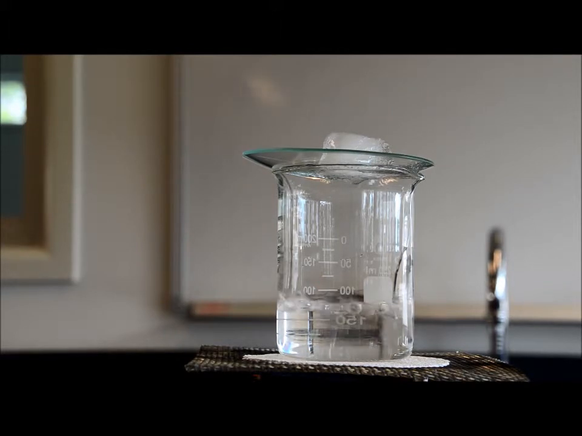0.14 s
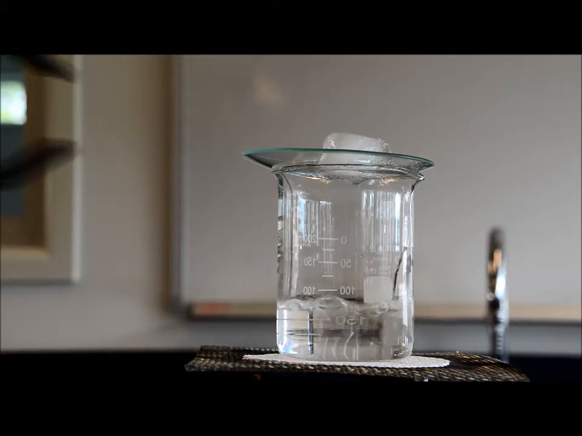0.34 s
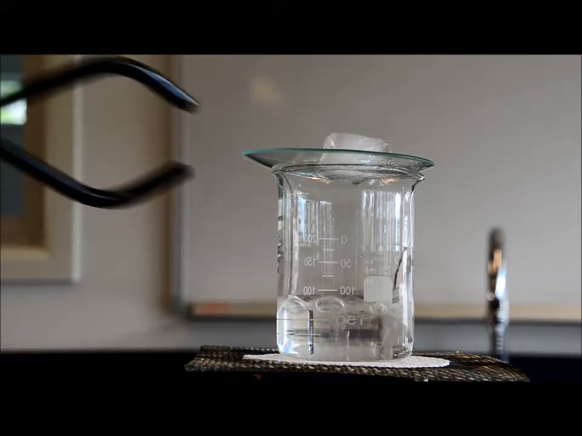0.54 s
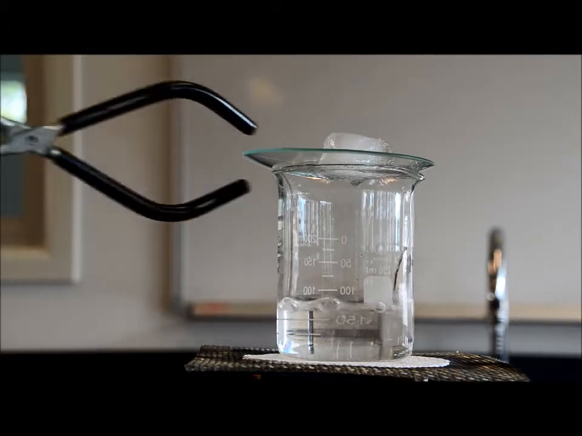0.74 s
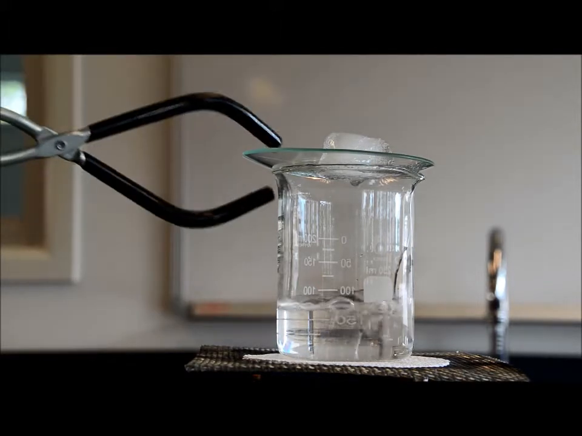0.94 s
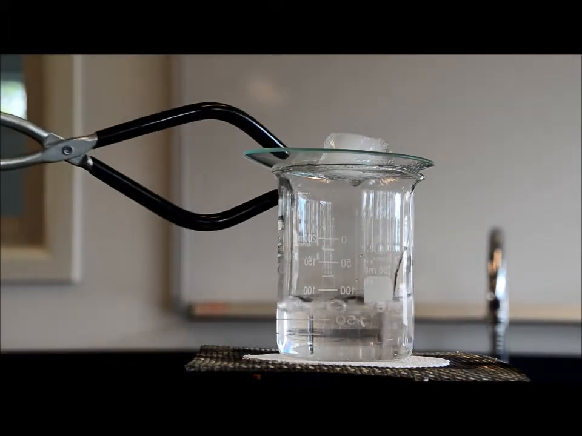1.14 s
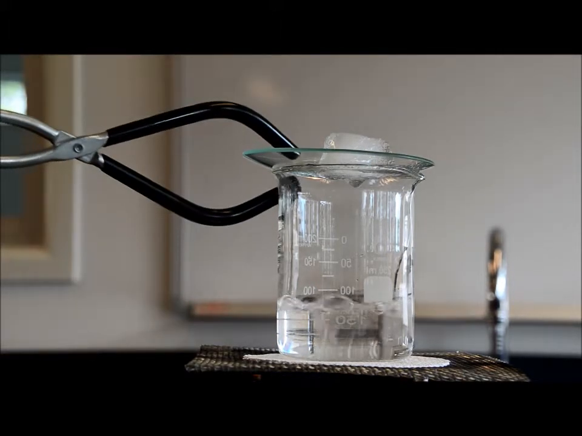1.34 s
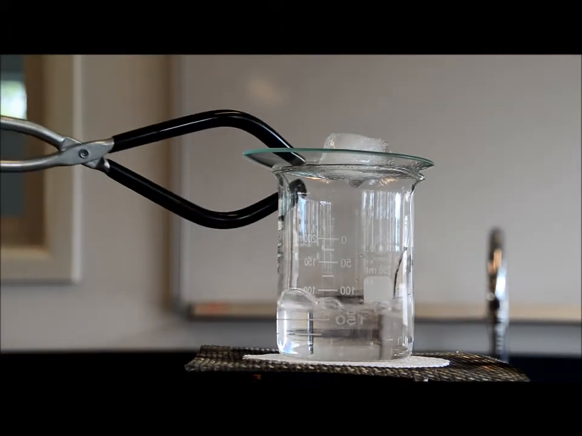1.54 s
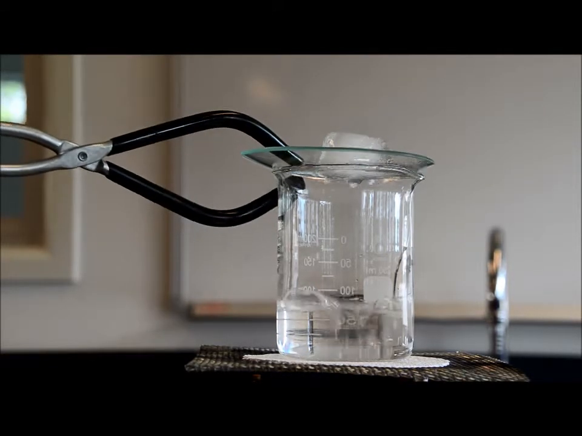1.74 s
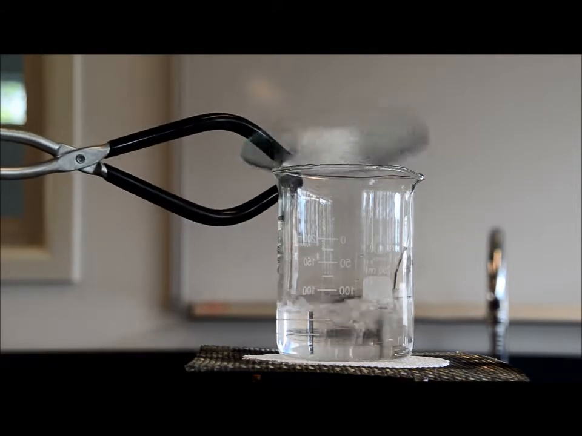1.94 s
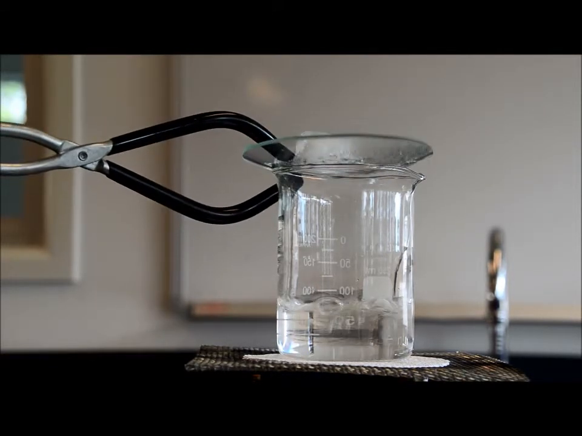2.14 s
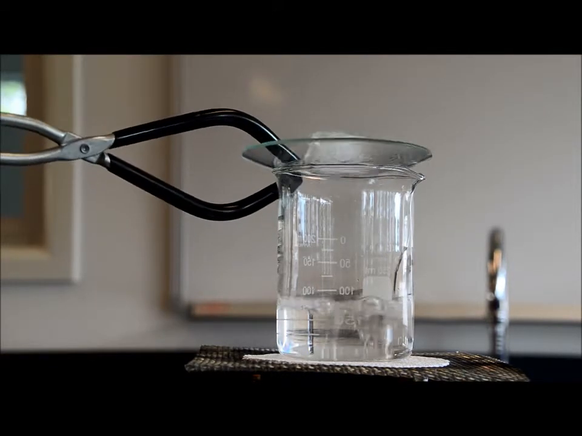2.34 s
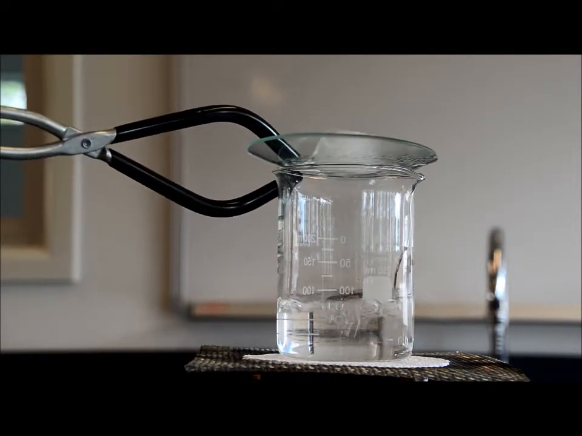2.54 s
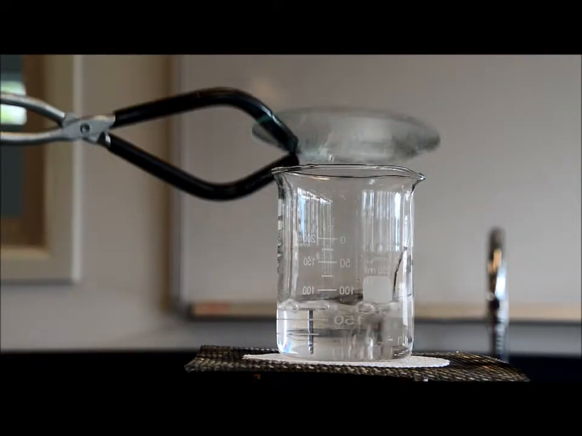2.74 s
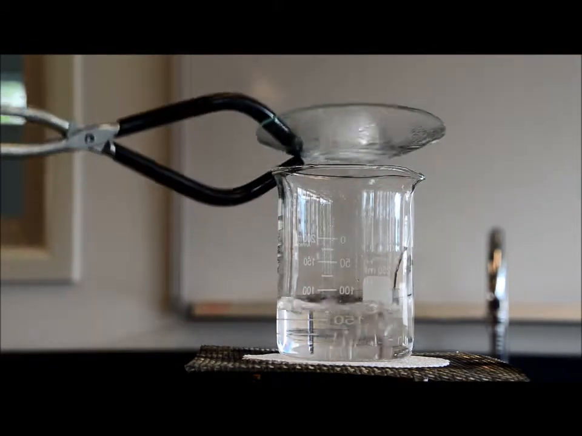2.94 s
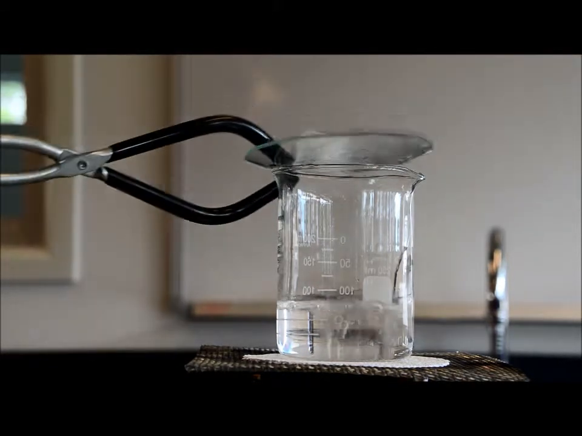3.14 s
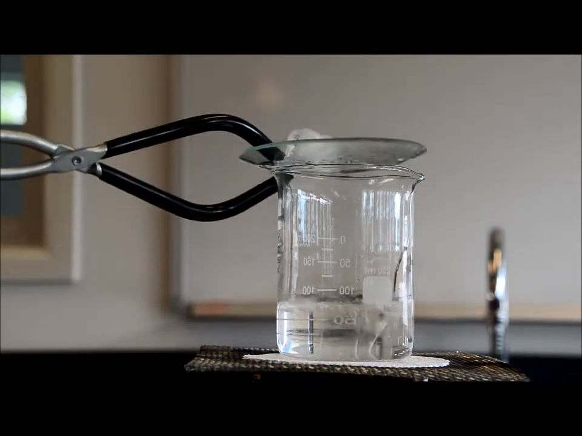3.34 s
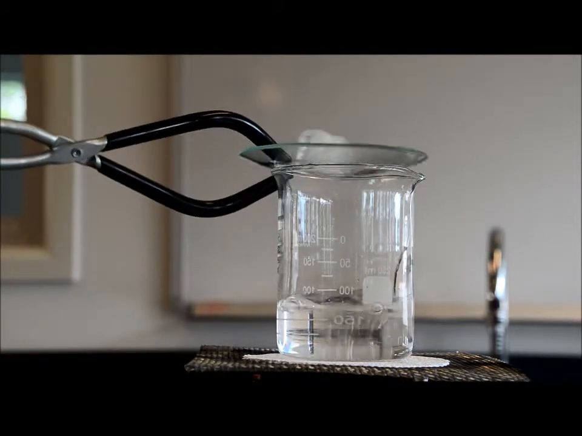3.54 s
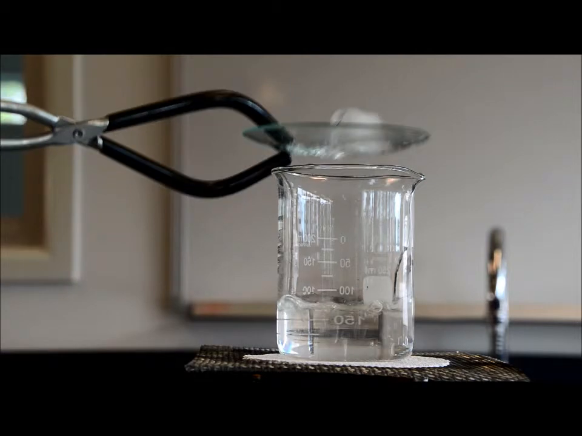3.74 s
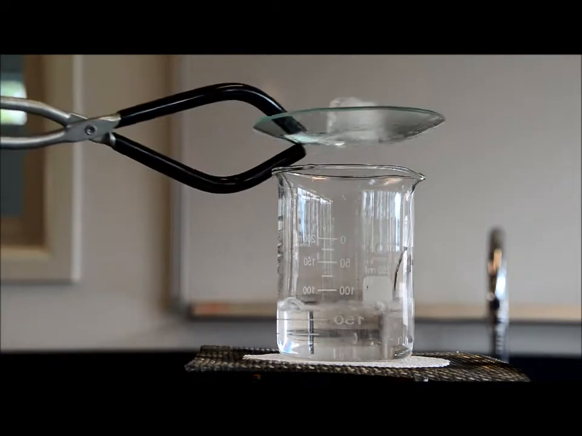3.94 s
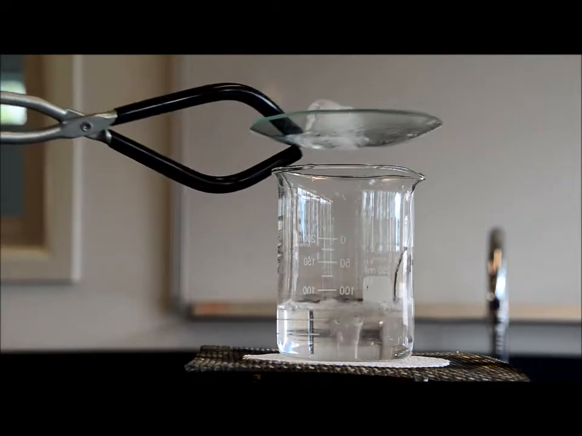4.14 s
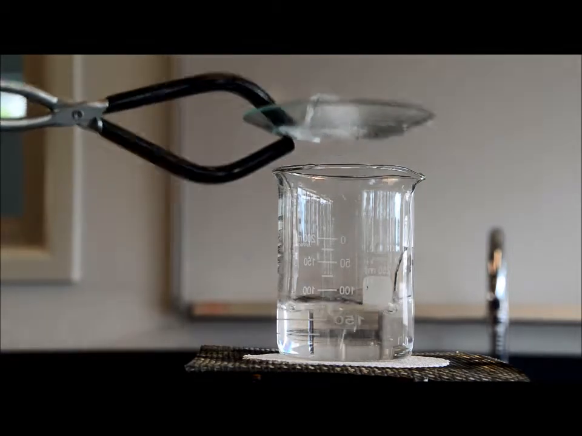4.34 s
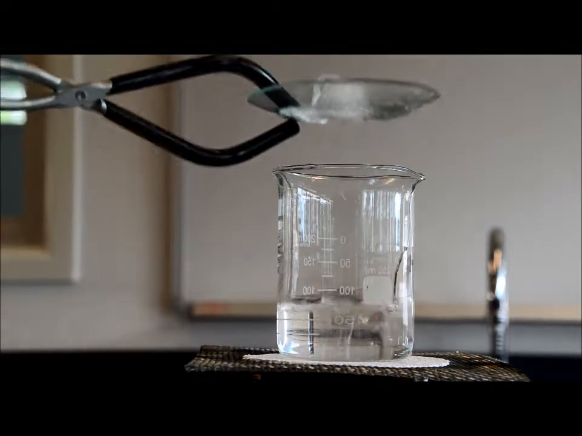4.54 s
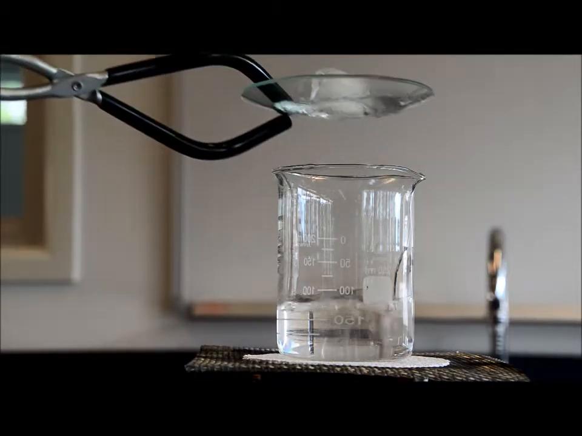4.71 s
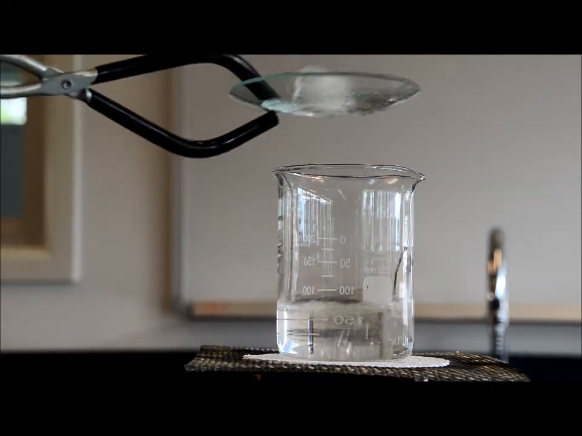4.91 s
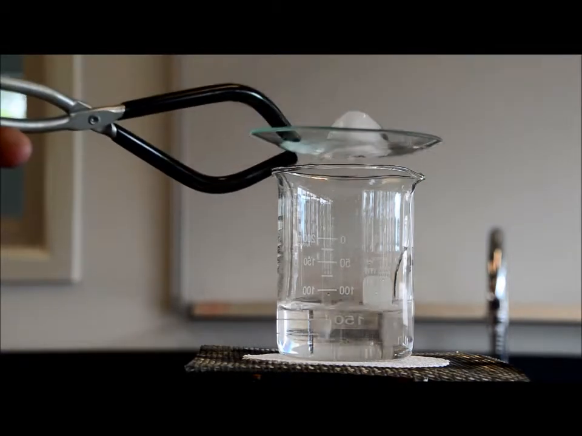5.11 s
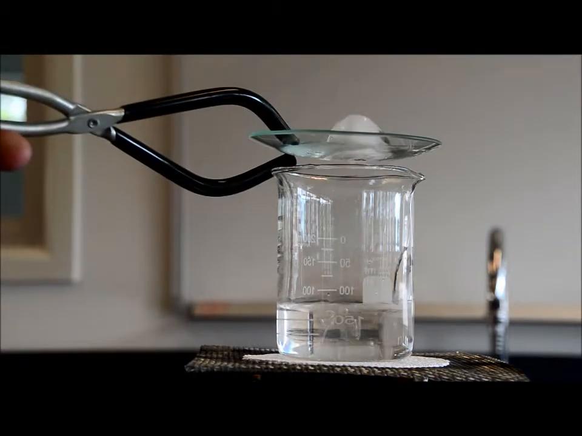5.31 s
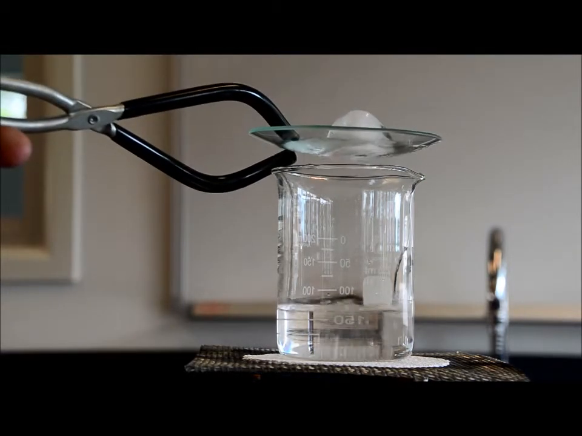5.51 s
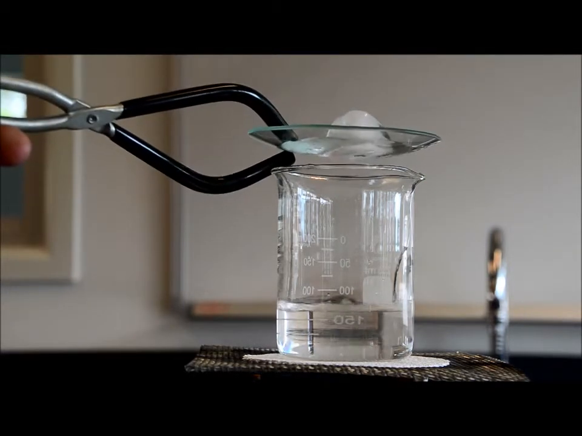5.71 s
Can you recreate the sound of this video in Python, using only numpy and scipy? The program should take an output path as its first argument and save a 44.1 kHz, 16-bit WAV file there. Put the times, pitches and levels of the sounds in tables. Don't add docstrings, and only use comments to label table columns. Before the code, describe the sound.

A steady narrow airy roar and hiss fades in while tongs clink glass on a beaker; after a brief gap it returns with a sharp glass clack.

```python
import sys
import numpy as np
from scipy import signal
from scipy.io import wavfile

SR = 44100
rng = np.random.default_rng(int(sys.argv[2]) if len(sys.argv) > 2 else 0)


def transcribe(signal):
    frames = np.atleast_2d(signal).T
    limited = np.clip(frames, -1, 1)
    pcm = np.round(limited * 32767).astype(np.int16)
    wavfile.write(sys.argv[1], SR, pcm)


def ratio_of_db(decibels):
    return 10 ** (np.asarray(decibels, float) / 20)


N = 254456

# t/s, level/dB
DRAUGHT = [
    (0, -42),
    (.8, -42),
    (1.0, -47.5),
    (1.3, -50),
    (1.46, -41),
    (3.1, -40.5),
    (4.8, -41),
    (5.0, -45),
    (5.3, -48.5),
    (5.77, -47.5),
]
# f/Hz, width/Hz, level/dB
TUBE = [(1078.3, 71, 0), (1002.7, 72.4, -6), (1274, 69, -19.5), (627, 64, -23.5), (1814, 120, -27),
        (320.3, 42, -27.5)]
# f/Hz, level/dB per Hz
FLAME = [(1300, -10.5), (1600, -5.5), (1900, -3.5), (2400, -3), (2800, -6.5), (3300, -5.5)]
# f/Hz, level/dB per Hz
HISS = [(3200, -12), (3500, -11), (3900, -5), (4700, -0.5), (5300, -9), (6500, -11.5), (7100, -15),
        (7800, -11), (9500, -11.5), (11000, -18), (12000, -20.5), (13500, -25.5), (14500, -26.5),
        (15700, -31.5)]
# f/Hz, width/Hz, level/dB
JET = [(3502, 110, -7), (4706, 960, -5), (6490, 270, -11.5), (7680, 220, -14), (9570, 630, -14),
       (11920, 360, -19)]
# f/Hz, level/dB per Hz
RUMBLE = [(60, -11), (80, -5), (124, -1.5), (330, -4), (500, -3.5), (720, -0.5), (900, -5.5)]
# t/s, level/dB
FAN_LOAD = [
    (0, -70.5),
    (1.55, -69.5),
    (1.63, -78),
    (1.8, -79),
    (1.9, -73.5),
    (3.0, -64.5),
    (3.4, -69.5),
    (5.1, -69.5),
    (5.25, -79),
]
# t/s, clink/dB, rim knock/dB re clink, bowl/dB re clink
KNOCKS = [(1.4935, -41, -15, 0), (1.4978, -39.5, -12, -20), (1.5008, -40.5, -6, -6), (1.8697, -36.5, 0, -8),
          (1.887, -47, 0, -2), (2.1418, -54, 0, 2), (2.1505, -52, -5, -8), (2.4528, -42, -8, -10),
          (3.0864, -25.5, 1, -7), (3.0915, -35.5, -5, -10), (3.0958, -44, 5, 10), (3.153, -50, -10, 1)]
# t/s, clink/dB, rim knock/dB re clink, bowl/dB re clink
SETTLE = [(5.5205, -41.5, 8.5, -3), (5.524, -33, -3, 8), (5.5345, -46, 8, -4), (5.5415, -47, 11, 10),
          (5.5545, -47, 6, 8), (5.5722, -18, -44, -4.5), (5.581, -38, -0.5, -10), (5.6902, -44, -2, 6),
          (5.695, -52, 2, 16.5), (5.7004, -47, 4, 15), (5.706, -51, 1, 4), (5.711, -32.5, -15, 7),
          (5.722, -51, 7, -7)]
# f/Hz, level/dB, t60/s
GLASS_LIFTED = [(418, -20, 0.02), (896, 0.5, 0.075), (1430, 0.5, 0.028), (1717, -7.5, 0.073),
                (2144, 0, 0.016), (2623, 2.5, 0.014), (2900, 5, 0.016), (3027, -10.5, 0.022),
                (3295, 3.5, 0.026), (3875, -20.5, 0.018), (5240, -15, 0.028), (5800, -2.5, 0.037),
                (6230, 0.5, 0.028), (6700, 0.5, 0.031), (7960, -6, 0.066), (9330, -6.5, 0.026),
                (9730, -15, 0.038), (11130, -9.5, 0.079), (11620, -18, 0.042), (12760, -12, 0.023),
                (15050, -37.5, .04), (15310, -30.5, 0.06)]
# f/Hz, level/dB, t60/s
GLASS_SEATED = [(347, -7, 0.094), (776, 3, 0.037), (1380, -3.5, 0.02), (1690, -2, 0.016),
                (2034, -1.5, 0.018), (2597, -4, 0.047), (3600, 2, 0.019), (3870, 4.5, 0.017),
                (4210, 3, 0.0057), (5160, -18, 0.018), (6200, -12, 0.049), (6500, 1.5, 0.019),
                (7300, -14, .03), (8100, -17.5, 0.044), (10400, -20, 0.04), (11800, -25, .03),
                (14400, -36, .03)]
# f/Hz, level/dB, t60/s
RING_LIFTED = [(2820, -13.5, .1), (3413, -6, 0.22), (3490, -5, 0.35), (5970, -11, 0.25), (6160, -20, 0.21),
               (6440, -8, 0.23)]
# f/Hz, level/dB, t60/s
RING_SEATED = [(2067, -25, 0.19), (2600, -20, 0.14), (3624, -7.5, 0.24), (3530, -10, 0.3),
               (6300, -27, 0.16), (6600, -19, 0.25), (10320, -40, 0.23)]
# t/s, peak/dB, f/Hz
THUDS = [
    (1.495, -36.5, 440),
    (2.147, -45, 240),
    (3.09, -42.5, 260),
]
# t/s, peak/dB, f/Hz
TICKS = [(2.9577, -44, 4610), (4.1869, -44, 5080), (4.4974, -46, 4200), (2.1071, -42, 3480),
         (2.5471, -44, 5340), (3.714, -48, 3350), (3.8731, -41, 4620), (4.0574, -43, 4670),
         (4.5314, -44.5, 4480), (4.5494, -43, 3490), (4.6808, -41, 4040), (4.8284, -43, 4150),
         (4.9714, -43, 4220), (4.9844, -42, 4340), (5.0938, -44, 4830)]
# t/s, length/s, level/dB
GRATES = [
    (2.14, .025, -55),
    (4.959, 0.032, -66),
]
# t/s, length/s, curve power
FADES = [
    (.012, 1.375, 1.046),
    (5.18, 1.37, 1.22),
]

FLAME_DB, HISS_DB, RUMBLE_DB = -62.5, -63, -62
HUM_HZ, HUM_WANDER_HZ = 46.4, 0.21
PRISED_S, PRISE_TAKES_S = 1.25, 0.25
COVER_LOSS_DB, COVER_CRACKLE_DB = 3.5, -8
CRACK_DB, BODY_CRACK_DB, CRACK_T60_S = -4, -3.5, 0.047
SHEEN_DB, SHEEN_GROWS = -8, 0.65
MODE_DAMPING = 0.75
RING_DB, RING_GROWS, RING_SHORTER, RING_FLUTTER_DB = -19, 0.45, 0.7, 4
THUD_CYCLES = 6.9
CUT_S, RESUME_S, ROOM_DROP_DB = 5.115, 5.214, -9
SPILL_S, SPILL_DB, SPILL_FALL_DB_PER_S = 0.034, -26, 600
NOTCH_HZ, NOTCH_WIDTH_HZ, TOP_HZ = 5680, 350, 16200


def rms_one(x):
    return x / np.sqrt(np.mean(x ** 2) + 1e-20)


def in_time(rows):
    s, *columns = np.transpose(rows)
    return [np.interp(np.arange(N) / SR, s, c) for c in columns]


def drift(rate_hz):
    r = np.exp(-80 * np.pi * rate_hz / SR)
    white = rng.standard_normal(N // 40 + 2002)
    slow = signal.lfilter([1], [1, -2 * r, r * r], white)[2000:]
    return np.interp(np.arange(N) / 40, np.arange(len(slow)), rms_one(slow))


def resonance(x, hz, width_hz):
    r = np.exp(-np.pi * width_hz / SR)
    poles = [1, -2 * r * np.cos(2 * np.pi * hz / SR), r * r]
    return signal.lfilter([(1 - r * r) / 2, 0, (r * r - 1) / 2], poles, x)


def ring(clicks, hz, t60_s):
    r = ratio_of_db(-60 / (t60_s * SR))
    w = 2 * np.pi * hz / SR
    return signal.lfilter([0, np.sin(w)], [1, -2 * r * np.cos(w), r * r], clicks + 1e-18)


def band(x, low_hz, high_hz):
    edges_hz = [low_hz, min(high_hz, 0.47 * SR)]
    return signal.sosfilt(signal.butter(2, edges_hz, "band", fs=SR, output="sos"), x)


def banded_noise(spectrum, patchy_db):
    hz, db = np.transpose(spectrum)
    out, together, white = 0, drift(5.6), rng.standard_normal((2, N))
    edges_hz = np.geomspace(hz[0], hz[-1], len(hz) + 2)
    for k, (low, high) in enumerate(zip(edges_hz, edges_hz[1:])):
        level_db = np.interp(np.log(low * high) / 2, np.log(hz), db)
        flicker_db = patchy_db * (0.95 * together + drift(36.0))
        out = out + ratio_of_db(level_db + flicker_db) * band(white[k % 2], low, high)
    return rms_one(out)


def clicks_at(rows, db):
    out = np.zeros(N)
    out[np.round(np.array(rows)[:, 0] * SR).astype(int)] = ratio_of_db(db)
    return out


def burner():
    level_db, = in_time(DRAUGHT)
    column = 0
    for hz, width_hz, db in TUBE:
        peak = resonance(rng.standard_normal(N), hz, width_hz)
        column = column + ratio_of_db(db) * resonance(peak, hz, 2.19 * width_hz)
    return ratio_of_db(level_db - 1.54 + 0.3 * drift(4.1)) * rms_one(column)


def covered():
    s = np.arange(N) / SR
    return np.where(s < CUT_S, np.clip(1 - (s - PRISED_S) / PRISE_TAKES_S, 0, 1), 1)


def gas_and_air():
    lid = covered()
    white = rng.standard_normal(N)
    jet = 0
    for hz, width_hz, db in JET:
        peak = resonance(resonance(white, hz, width_hz), hz, 2 * width_hz)
        jet = jet + ratio_of_db(db) * rms_one(peak)
    born = rng.random(N) < 220 * ratio_of_db(5.0 * drift(5.0)) / SR
    sizes = ratio_of_db(3.0 * np.minimum(rng.exponential(1, N), 3)) * rng.choice([-1, 1], N)
    crackle = rms_one(band(band(sizes * born, 4500, 10500), 4500, 10500))
    hiss = banded_noise(HISS, patchy_db=2.0) + jet + ratio_of_db(-7.5 + COVER_CRACKLE_DB * lid) * crackle
    flame = ratio_of_db(FLAME_DB + 0.5) * banded_noise(FLAME, patchy_db=2.03)
    rumble_db = RUMBLE_DB + ROOM_DROP_DB * (np.arange(N) > CUT_S * SR)
    rumble = ratio_of_db(rumble_db) * banded_noise(RUMBLE, patchy_db=1.4)
    return flame + ratio_of_db(HISS_DB - COVER_LOSS_DB * lid) * hiss + rumble


def fan():
    level_db, = in_time(FAN_LOAD)
    pitch_hz = HUM_HZ + HUM_WANDER_HZ * drift(2.5)
    return ratio_of_db(level_db + 4.5 + 0.68 * drift(3.5)) * np.sin(2 * np.pi * np.cumsum(pitch_hz) / SR)


def glass(hits, modes, long_modes, dull):
    _, clink_db, knock_db, bowl_db = np.transpose(hits)
    hardest_db = clink_db + np.maximum(bowl_db + 1, 0)
    bright_db = hardest_db + SHEEN_GROWS * (hardest_db - hardest_db.max())
    group_db = [clink_db + knock_db, clink_db + bowl_db, clink_db, bright_db + SHEEN_DB]
    ring_db = RING_DB + RING_GROWS * (clink_db - clink_db.max() + 14)
    touch_db = rng.normal(0, 1.8, (len(hits), len(modes)))
    out = np.zeros(N)
    for k, (hz, db, t60_s) in enumerate(modes):
        level_db = group_db[np.searchsorted([1200, 2900, 5600], hz)]
        clicks = clicks_at(hits, level_db + db + touch_db[:, k])
        out += (-1) ** k * ring(clicks, hz, t60_s * MODE_DAMPING)
    for hz, db, t60_s in long_modes:
        clicks = clicks_at(hits, clink_db + ring_db + db)
        out += ratio_of_db(RING_FLUTTER_DB * drift(30)) * ring(clicks, hz, t60_s * RING_SHORTER)
    age_s = np.arange(4000) / SR
    splinter = ratio_of_db(-60 * age_s / CRACK_T60_S) * rng.standard_normal(len(age_s))
    crack = signal.fftconvolve(clicks_at(hits, bright_db + CRACK_DB), splinter)[:N]
    out += signal.lfilter([1 - dull], [1, -min(dull, 0.95)], crack)
    body_crack = signal.fftconvolve(clicks_at(hits, hardest_db + BODY_CRACK_DB), splinter)[:N]
    out += band(body_crack, 1100, 3500)
    echoes = ratio_of_db(-33.0 - 60 * age_s / 0.07) * rng.standard_normal(len(age_s)) * (age_s > 0.002)
    return band(out + signal.fftconvolve(out, echoes)[:N], 240, 17000)


def thuds():
    out = np.zeros(N)
    for s, peak_db, hz in THUDS:
        bump = ring(clicks_at([[s]], peak_db), hz, THUD_CYCLES / hz)
        out += signal.lfilter([0.1], [1, -0.9], bump)
    return out


def bubbles():
    out = np.zeros(N)
    for s, peak_db, hz in TICKS:
        at, click = round(s * SR), np.zeros(600)
        click[0] = ratio_of_db(peak_db - 3.5)
        out[at:at + 600] += ring(click, hz, 29.0 / hz) + 1.4 * band(click, 3000, 8900)
    return out


def grating():
    s = np.arange(N) / SR
    grains = rng.standard_normal(N) * (rng.random(N) < 2500 / SR)
    grit = rms_one(band(grains, 3000, 11000))
    strokes = 0
    for start_s, length_s, db in GRATES:
        strokes = strokes + ratio_of_db(db) * np.sin(np.pi * np.clip((s - start_s) / length_s, 0, 1))
    return grit * strokes


def scene():
    steady = burner() + gas_and_air() + fan()
    knocks = glass(KNOCKS, GLASS_LIFTED, RING_LIFTED, dull=0.55)
    settle = glass(SETTLE, GLASS_SEATED, RING_SEATED, dull=0.97)
    return (steady + knocks + settle + thuds() + bubbles() + grating())[None]


def scene_change():
    s = np.arange(N) / SR
    first, second = (np.clip((s - start_s) / length_s, 0, 1) ** power for start_s, length_s, power in FADES)
    spill = ratio_of_db(SPILL_DB - SPILL_FALL_DB_PER_S * np.maximum(s - CUT_S, 0))
    before = first * np.select([s < CUT_S, s < CUT_S + SPILL_S], [1, spill], 0)
    return before + second * (s > RESUME_S)


def roll_off(x):
    return signal.sosfilt(signal.butter(12, 15980, fs=SR, output="sos"), x)


def record(dry):
    notched = dry - 0.73 * resonance(dry[0], NOTCH_HZ, NOTCH_WIDTH_HZ)
    dull_top = signal.cheby2(12, 60, TOP_HZ, fs=SR, output="sos")
    mix = signal.sosfilt(dull_top, notched * scene_change())
    return roll_off(mix)


dry = scene()
out = record(dry)
transcribe(out)
```